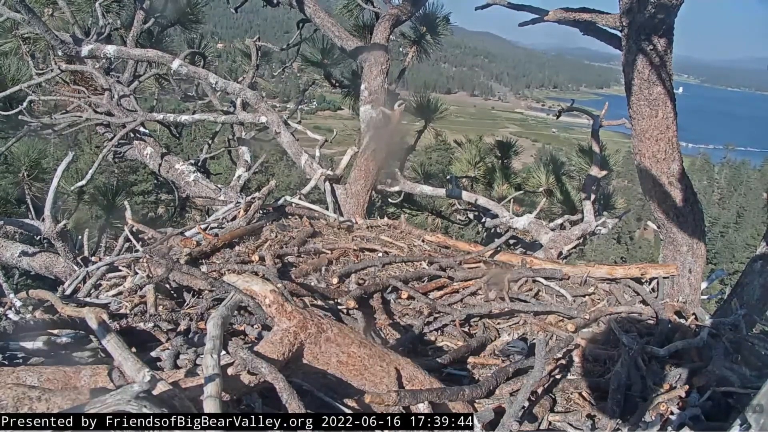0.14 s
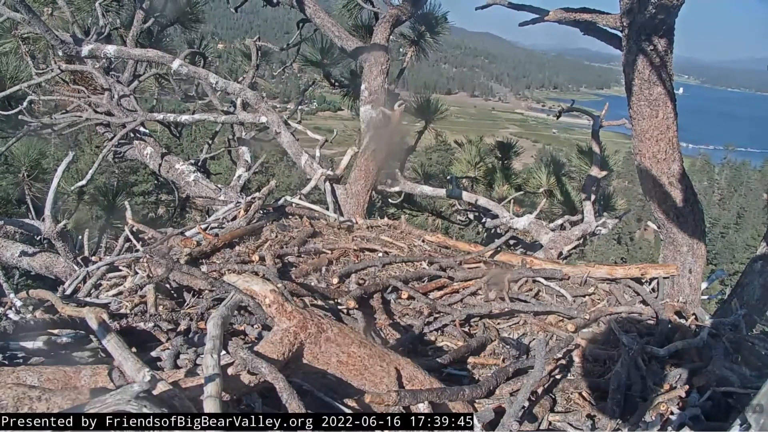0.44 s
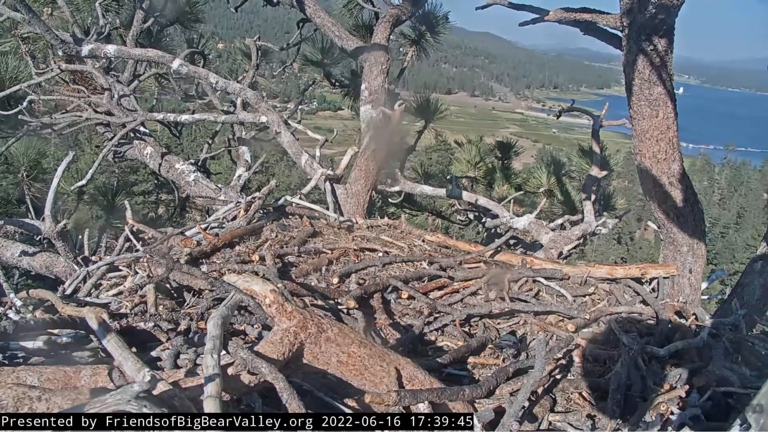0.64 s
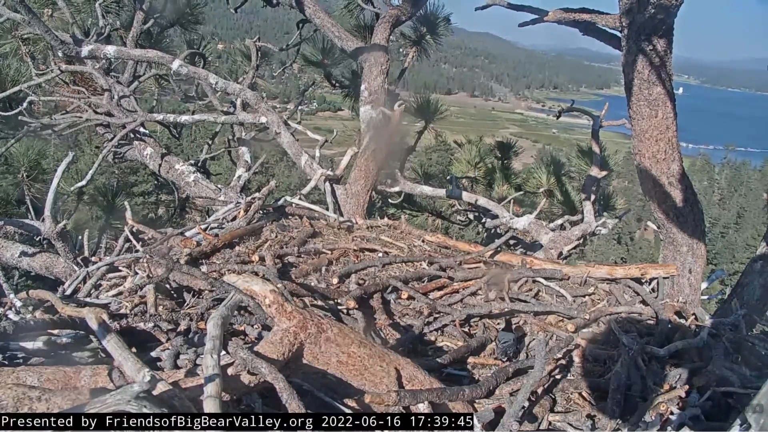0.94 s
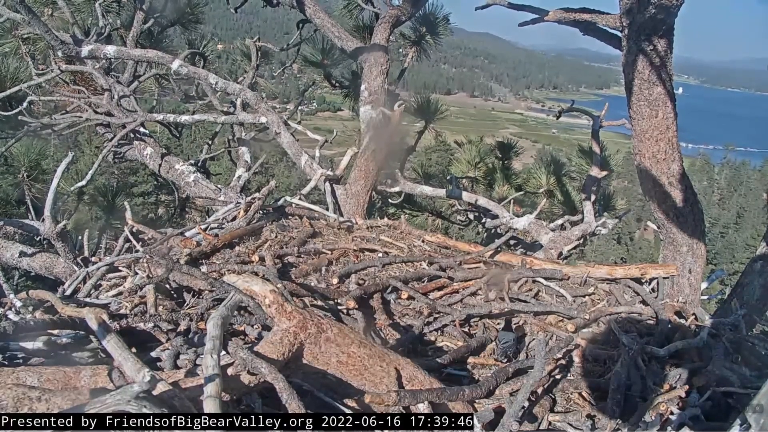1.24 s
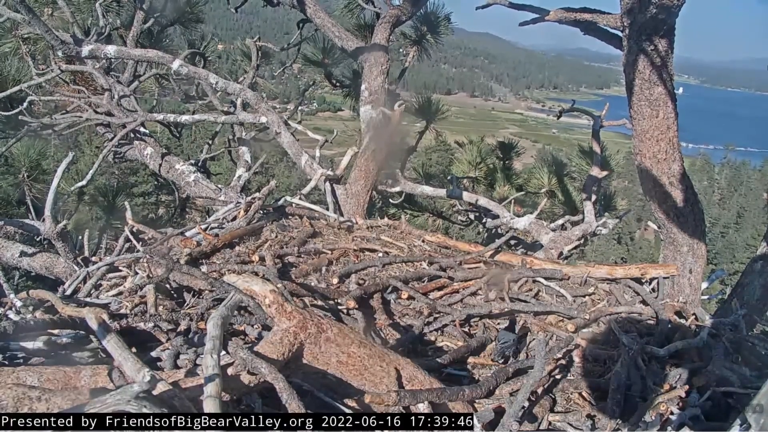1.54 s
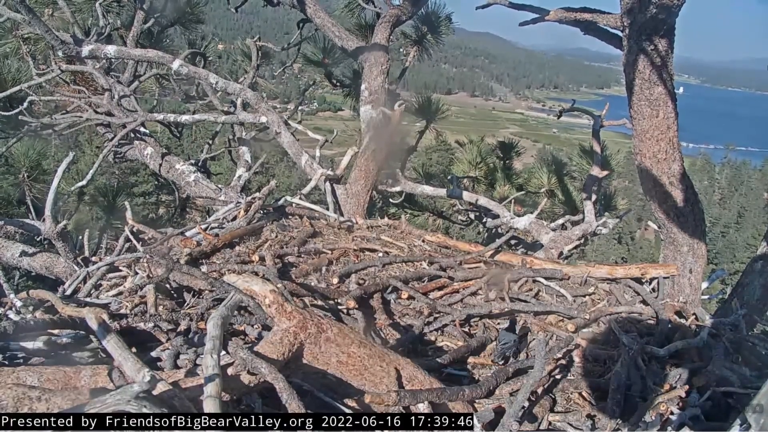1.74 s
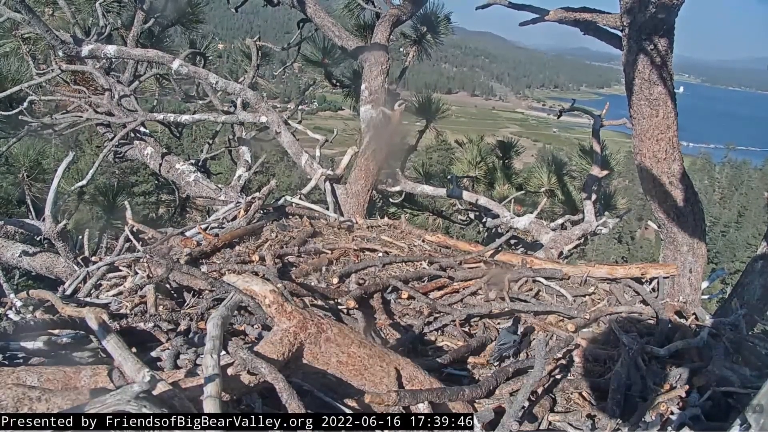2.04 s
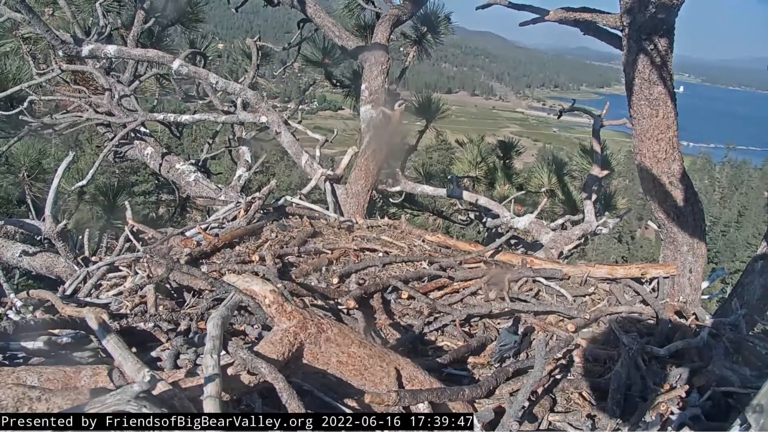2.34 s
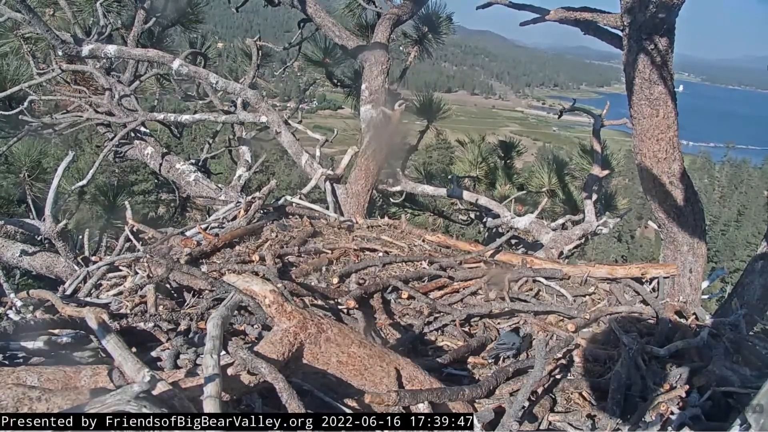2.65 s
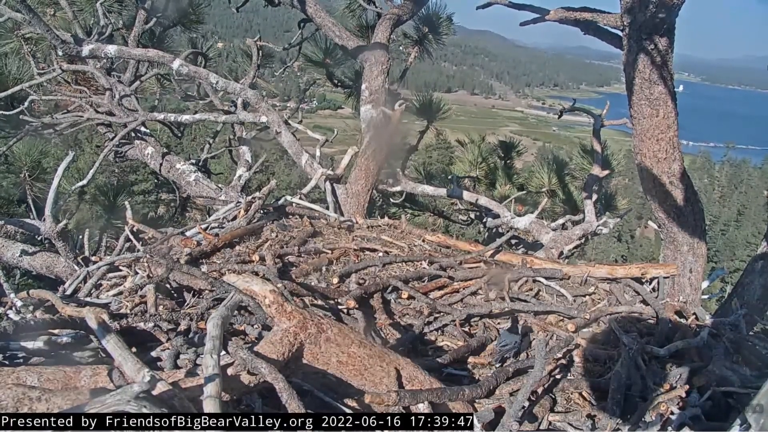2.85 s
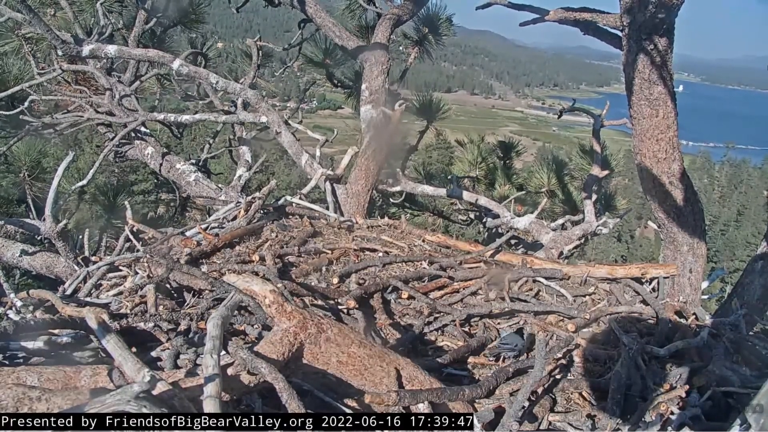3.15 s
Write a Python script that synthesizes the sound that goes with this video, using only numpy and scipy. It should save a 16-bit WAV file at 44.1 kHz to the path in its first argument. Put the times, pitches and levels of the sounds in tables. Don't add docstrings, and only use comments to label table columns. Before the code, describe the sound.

A small unseen bird sings high, thin, gliding whistles, then a fast buzzy trill, then more separate whistles, among pines; a fixed outdoor microphone adds low wind rumble, steady hiss and regular tiny ticks.

```python
import sys
import numpy as np
from scipy import signal
from scipy.fft import rfft, irfft
from scipy.io import wavfile

SR = 44100
rng = np.random.default_rng(int(sys.argv[2]) if len(sys.argv) > 2 else 0)


def attenuation_scalar(level_db):
    decades = np.asarray(level_db, float) / 20
    return 10 ** decades


def store_pcm(level_fs):
    pcm = np.round(np.clip(level_fs, -1, 1) * 32767).astype(np.int16)
    wavfile.write(sys.argv[1], SR, np.atleast_2d(pcm).T)


N = 145530
T = np.arange(N) / SR

# t/s, f/Hz, level/dB
OPENING_FALL = [(0, 3850, -58), (.03, 4000, -56), (.048, 3990, -63), (.059, 3900, -54), (.065, 3430, -48),
                (.071, 3330, -46), (.076, 3150, -56), (.082, 2950, -51), (.095, 2380, -60)]
SECOND_FALL = [(.155, 2870, -63), (.175, 3370, -57), (.203, 3620, -57), (.21, 3600, -63), (.224, 3460, -49),
               (.232, 3380, -51), (.235, 3200, -56), (.24, 3050, -48), (.251, 2500, -60)]
STEPPED_CLIMB = [(.432, 2550, -57), (.443, 2600, -54), (.447, 3080, -55), (.453, 3250, -53),
                 (.462, 3420, -55), (.505, 3620, -52), (.511, 3920, -52), (.522, 3880, -57),
                 (.53, 3800, -62)]
HIGH_DROP = [(.529, 3640, -54), (.54, 3520, -52), (.557, 3660, -50), (.563, 3920, -55), (.585, 3950, -51),
             (.62, 3950, -54), (.625, 3500, -51), (.635, 3340, -50), (.654, 2400, -62)]
SLOW_CLIMB = [(.768, 2800, -60), (.777, 3350, -58), (.792, 3500, -56), (.797, 3880, -56), (.82, 3880, -55),
              (.853, 3810, -64), (.875, 3950, -61), (.898, 4030, -54), (.922, 3950, -58)]
RISE_AFTER_TRILL = [(1.34, 3050, -59), (1.352, 3130, -54), (1.359, 3200, -56), (1.364, 3520, -57),
                    (1.38, 3550, -54), (1.388, 3640, -61), (1.425, 3820, -61)]
SMALL_ARCH = [(1.417, 3060, -58), (1.432, 3580, -58), (1.442, 3620, -58), (1.447, 3930, -57),
              (1.474, 3860, -58), (1.481, 3400, -63), (1.494, 3100, -57), (1.505, 2850, -62)]
FAINT_LEVEL = [(1.66, 3420, -66), (1.71, 3480, -59), (1.728, 3510, -61), (1.738, 3520, -55),
               (1.775, 3490, -56), (1.792, 3450, -62)]
SHORT_LOW = [(1.953, 3050, -59), (1.965, 3180, -51), (1.99, 3130, -62)]
PULSING_LEVEL = [(1.99, 3470, -60), (2.03, 3550, -52), (2.047, 3510, -66), (2.06, 3500, -52),
                 (2.069, 3540, -62), (2.076, 3570, -50), (2.098, 3570, -47), (2.113, 3400, -49),
                 (2.12, 3330, -56)]
LOUD_ARCH = [(2.293, 3200, -55), (2.309, 3220, -57), (2.313, 3500, -54), (2.33, 3530, -54),
             (2.365, 3540, -46), (2.394, 3500, -54), (2.418, 3440, -50), (2.425, 3380, -57),
             (2.43, 3300, -54)]
STEADY_RISE = [(2.6, 3200, -54), (2.614, 3320, -49), (2.622, 3520, -51), (2.632, 3560, -47),
               (2.685, 3560, -50), (2.703, 3640, -54)]
HIGH_LEVEL = [(2.862, 3960, -62), (2.876, 4060, -55), (2.93, 4010, -60), (2.965, 4090, -52),
              (2.985, 3980, -55), (2.992, 3930, -61), (3.005, 3930, -58)]
LAST_FALL = [(2.982, 3600, -53), (2.992, 3470, -46), (3.001, 3400, -52)]
QUICK_RISE = [(1.922, 2870, -62), (1.936, 3470, -59), (1.955, 3400, -58)]
DIP_AND_RISE = [(2.7, 3580, -53), (2.709, 3540, -50), (2.726, 3400, -49), (2.76, 3450, -55),
                (2.812, 3570, -50), (2.824, 3580, -52), (2.834, 3620, -60)]
LOW_TAIL = [(2.117, 3120, -55), (2.131, 2980, -56)]
SECOND_LOW_TAIL = [(2.426, 3060, -52), (2.442, 2960, -54)]
FAR_NOTE = [(.835, 5720, -67), (.86, 5600, -72), (.88, 5480, -64), (.895, 5500, -70), (.915, 5520, -63)]
NOTES = [OPENING_FALL, SECOND_FALL, STEPPED_CLIMB, HIGH_DROP, SLOW_CLIMB, RISE_AFTER_TRILL, SMALL_ARCH,
         FAINT_LEVEL, SHORT_LOW, PULSING_LEVEL, LOUD_ARCH, STEADY_RISE, HIGH_LEVEL, LAST_FALL,
         QUICK_RISE, DIP_AND_RISE, LOW_TAIL, SECOND_LOW_TAIL, FAR_NOTE]
NOTES_DB, EDGE_S, WAVER_HZ, FLUTTER_DB = 1.8, .005, 15, 1.0

# f/Hz, width/Hz, depth (0-1)
NEST_NULLS = [
    (2840, 140, .45),
    (3240, 90, .35),
    (3760, 130, .75),
]

# t/s, level/dB
GUST = [
    (0, -48),
    (1.6, -47),
    (2.0, -44),
    (2.3, -38.5),
    (2.45, -35.5),
    (2.7, -39),
    (3.3, -40.5),
]
# f/Hz, level/dB per Hz
BUFFET = [(15, -51), (25, -37.5), (79, -5), (107, 0.5), (130, -2), (170, -39), (290, -120)]
# f/Hz, level/dB per Hz
HOUSING = [(53, -59), (90, -7.5), (107, -12), (119, -6.5), (140, 0.5), (156, -5.5), (186, -7), (216, -13),
           (320, -37), (420, -66), (700, -120)]
HOUSING_DB, HOUSING_FOLLOWS = -39.5, 0.19
HUM_HZ, HUM_WIDTH_HZ, HUM_DB = 136, 13.4, -45.5
# f/Hz, level/dB per Hz
NEEDLES = [(160, -14), (280, -11.5), (316, -7), (692, 0), (1170, -3.5), (1880, -10), (2600, -12.5),
           (3380, -10), (5720, -120)]
NEEDLES_DB, NEEDLES_FOLLOWS = -51.5, 0.26

# f/Hz, level/dB per Hz
HISS = [(1500, -19.5), (2500, -1), (3300, 1), (6000, -1.5), (9000, 0.5), (13200, 1), (14900, -11.5),
        (15800, -12)]
HISS_DB = -50
# t/s, length/s, centre f/Hz
NOISE_SPLITS = [(.015, .04, 7700), (.015, .04, 11100), (.805, .04, 12500), (.88, .13, 4700),
                (.88, .08, 8400), (.92, .085, 13500), (2.083, .04, 10400), (2.23, .075, 5500),
                (2.55, .07, 9300), (2.55, .08, 12400), (2.79, .075, 5300), (2.79, .075, 11800),
                (2.79, .075, 13400), (2.895, .06, 6100), (2.895, .06, 9000), (2.97, .125, 4900),
                (3.02, .075, 12500)]
SPLIT_WIDTH_HZ, SPLIT_DB = 1340, -67

# t/s, peak level/dB, low mode f/Hz, high mode f/Hz, high mode level/dB
TAPS = [
    (.2775, -46, 2700, 3700, 0),
    (1.600, -44, 2750, 3300, 2),
    (1.9751, -35, 3600, 6030, -6),
    (1.9752, -41, 3120, 7200, -3),
    (1.9753, -48, 2410, 8440, -2),
    (2.5503, -35.5, 2620, 3280, 0),
    (2.9645, -44, 3100, 4670, 0),
    (2.9645, -49, 5550, 6360, -3),
    (2.9715, -38, 4060, 6380, -9),
    (2.9715, -45, 3320, 4700, 0),
]
# multiple of tap pitch, level/dB, t60/s
TWIG_MODES = [
    (1, 0.5, 0.016),
    (1.13, -10, .009),
    (.8, -7, 0.0068),
]

TICKS = [
    -24,
    -27.5,
    -25,
    -26.5,
    -25.5,
    -25,
    -27,
    -28,
    -28,
]
TICK_FIRST_S, TICK_EVERY_S, STRAY_TICK_S = .28232, .41002, 1.3731
TICK_HZ, TICK_T60_S, TICK_DB = 10400, 0.00043, 5.5
LEAD_S, LEAD_HZ, LEAD_T60_S, LEAD_DB = .0004, 8800, .0022, -7

# t/s, centre f/Hz, level/dB, side pulse level/dB
TRILL = [
    (.878, 3130, -50, -12),
    (.91, 3310, -48.5, -2),
    (1.17, 3330, -50, -2),
    (1.22, 3270, -50.5, -8),
    (1.345, 3280, -55, -7),
]
STROKES = [.866, .8875, .9099, .9298, .9514, .9732, .9948, 1.0158, 1.0385, 1.0601, 1.0827, 1.1039, 1.1258,
           1.1476, 1.169, 1.1924, 1.2143, 1.2372, 1.2596, 1.283, 1.3057, 1.3286, 1.352]
# place (0-1), half width/s, f/Hz from centre, fall/Hz per s, share of side level
TRILL_PULSES = [
    (0, .0028, 0, 62000, 0),
    (.31, .0018, -150, 20000, 1.8),
    (.55, .0022, 60, -50000, 2.2),
    (.74, .002, 260, 25000, 1),
]
# f/Hz, level/dB per Hz
RASP = [(2700, 0), (3300, 1), (4000, 1), (4600, 1)]
TRILL_DB, TRILL_RASP_DB, TRILL_WAVER_HZ, TRILL_FLUTTER_DB = 2.6, -13, 50, 1.8

FOREST_DB, FOREST_T60_S, FOREST_GAP_S = -10.5, .25, .005


def rms_one(x):
    return x / np.sqrt(np.mean(x ** 2) + 1e-20)


def drift(rate_hz):
    r = np.exp(-2 * np.pi * rate_hz / SR)
    noise = rng.standard_normal(N + SR)
    settled = signal.lfilter([1], [1, -2 * r, r * r], noise)[SR:]
    return rms_one(settled)


def coloured(spectrum, skirt_db=30):
    hz, db = np.transpose(spectrum)
    octave = np.log2(np.maximum(np.arange(N // 2 + 1) * SR / N, 1))
    below = np.maximum(np.log2(hz[0]) - octave, 0)
    above = np.maximum(octave - np.log2(hz[-1]), 0)
    shape_db = np.interp(octave, np.log2(hz), db) - skirt_db * (below + above)
    return rms_one(irfft(rfft(rng.standard_normal(N)) * attenuation_scalar(shape_db), N))


def band(centre_hz, width_hz, skirt_db):
    return coloured([(centre_hz - width_hz / 2, 0), (centre_hz + width_hz / 2, 0)], skirt_db)


def ring(clicks, hz, t60):
    r = attenuation_scalar(-np.log10(1000) * 20 / (t60 * SR))
    w = 2 * np.pi * hz / SR
    return signal.lfilter([0, np.sin(w)], [1, -2 * r * np.cos(w), r * r], clicks + 1e-18)


def whistle(s, hz, db):
    gate = np.clip(np.minimum(T - s[0], s[-1] - T) / EDGE_S, 0, 1)
    phase = 2 * np.pi * np.cumsum(hz) / SR
    return np.sqrt(2) * gate * attenuation_scalar(db) * np.sin(phase)


def notes():
    waver = WAVER_HZ * drift(42)
    flutter = FLUTTER_DB * drift(27)
    out = np.zeros(N)
    for note in NOTES:
        s, hz, db = np.transpose(note)
        out += whistle(s, np.interp(T, s, hz) + waver, np.interp(T, s, db) + flutter)
    return out


def nest(x):
    for hz, width_hz, depth in NEST_NULLS:
        b, a = signal.iirpeak(hz, hz / width_hz, fs=SR)
        x = x - depth * signal.lfilter(b, a, x)
    return x


def forest(x):
    s = T[:SR // 2]
    decay = attenuation_scalar(-np.log10(1000) * 20 * s / FOREST_T60_S)
    tail = rng.standard_normal(len(s)) * decay * (s > FOREST_GAP_S)
    tail = tail / np.sqrt(np.sum(tail ** 2))
    return attenuation_scalar(FOREST_DB) * signal.fftconvolve(x, tail)[:N]


def wind():
    s, db = np.transpose(GUST)
    gust_db = np.interp(T, s, db)
    swing_db = gust_db - gust_db.mean()
    hum = attenuation_scalar(HUM_DB) * band(HUM_HZ, HUM_WIDTH_HZ, skirt_db=83)
    rumble = attenuation_scalar(HOUSING_DB) * coloured(HOUSING)
    housing = attenuation_scalar(HOUSING_FOLLOWS * swing_db) * (rumble + hum)
    needles_db = NEEDLES_DB + NEEDLES_FOLLOWS * swing_db + 0.49 * drift(16.0)
    needles = attenuation_scalar(needles_db) * coloured(NEEDLES, skirt_db=26)
    buffet = attenuation_scalar(gust_db + 1.5) * coloured(BUFFET, skirt_db=35)
    return buffet + housing + needles


def hiss():
    return attenuation_scalar(HISS_DB) * coloured(HISS)


def noise_splits():
    side = np.zeros(N)
    for s, length, hz in NOISE_SPLITS:
        gate = np.clip(np.minimum(T - s, s + length - T) / .012, 0, 1)
        side += gate * band(hz, SPLIT_WIDTH_HZ, skirt_db=600)
    return attenuation_scalar(SPLIT_DB) * side


def taps():
    out = np.zeros(N)
    for s, db, low_hz, high_hz, high_db in TAPS:
        click = np.zeros(N)
        click[int(s * SR)] = attenuation_scalar(db)
        tap = np.zeros(N)
        for multiple, mode_db, t60 in TWIG_MODES:
            low = ring(click, low_hz * multiple, t60)
            high = attenuation_scalar(high_db) * ring(click, high_hz * multiple, t60)
            tap += attenuation_scalar(mode_db) * (low + high)
        out += tap
    return out


def ticks():
    out = np.zeros(N)
    times = [*(TICK_FIRST_S + TICK_EVERY_S * np.arange(len(TICKS) - 1)), STRAY_TICK_S]
    detunes = rng.uniform(1.0, 1.16, (len(times), 2))
    for s, db, (lead_detune, main_detune) in zip(times, TICKS, detunes):
        click = np.zeros(N)
        click[int(s * SR) - 1] = attenuation_scalar(db)
        early_click = np.roll(click, -int(LEAD_S * SR))
        main = attenuation_scalar(TICK_DB) * ring(click, TICK_HZ * main_detune, TICK_T60_S)
        lead = attenuation_scalar(LEAD_DB) * ring(early_click, LEAD_HZ * lead_detune, LEAD_T60_S)
        out += main - lead
    return signal.sosfilt(signal.butter(6, 14000, fs=SR, output="sos"), out)


def trill():
    s, *columns = np.transpose(TRILL)
    hz, db, side_db = (np.interp(T, s, column) for column in columns)
    beats = np.interp(T, STROKES, np.arange(len(STROKES)))
    rate = np.interp(T, STROKES, 1 / np.gradient(STROKES))
    sounding = (T > s[0]) & (T < s[-1])
    out = sounding * attenuation_scalar(db + TRILL_RASP_DB + 4.2 * drift(80)) * coloured(RASP, skirt_db=60)
    for place, half_s, offset_hz, fall, share in TRILL_PULSES:
        which = np.round(beats - place)
        since = (beats - place - which) / rate
        chance = rng.standard_normal((256, 2))[which.astype(int) % 256]
        glide = fall * np.clip(since, -2 * half_s, 2 * half_s)
        pitch = hz + offset_hz - glide + TRILL_WAVER_HZ * chance[:, 0]
        level_db = db + share * side_db + TRILL_FLUTTER_DB * chance[:, 1]
        pulse = np.exp(-.5 * (since / half_s) ** 2)
        out = out + pulse * whistle(s, pitch, level_db)
    return out


def scene():
    bird = attenuation_scalar(NOTES_DB) * nest(notes()) + attenuation_scalar(TRILL_DB) * trill() + taps()
    mono = bird + forest(bird) + wind() + hiss() + ticks()
    return np.array([mono, mono])


def low_pass(x):
    return signal.sosfilt(signal.butter(12, 15770, fs=SR, output="sos"), x)


def record(dry):
    stereo = dry + noise_splits() * [[1], [-1]]
    treble_cut = signal.ellip(10, .5, 60, 15700, fs=SR, output="sos")
    mix = signal.sosfilt(treble_cut, stereo)
    return low_pass(mix)


dry = scene()
out = record(dry)
store_pcm(out)
```